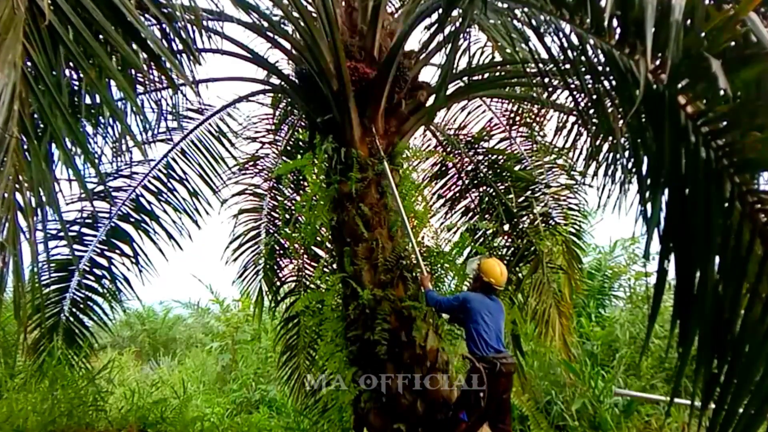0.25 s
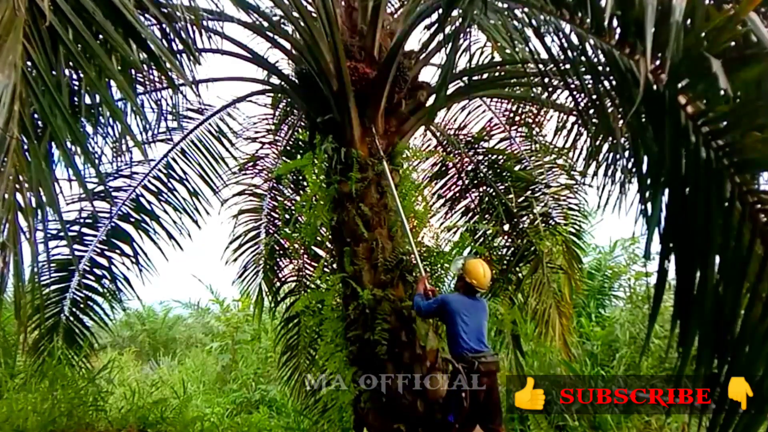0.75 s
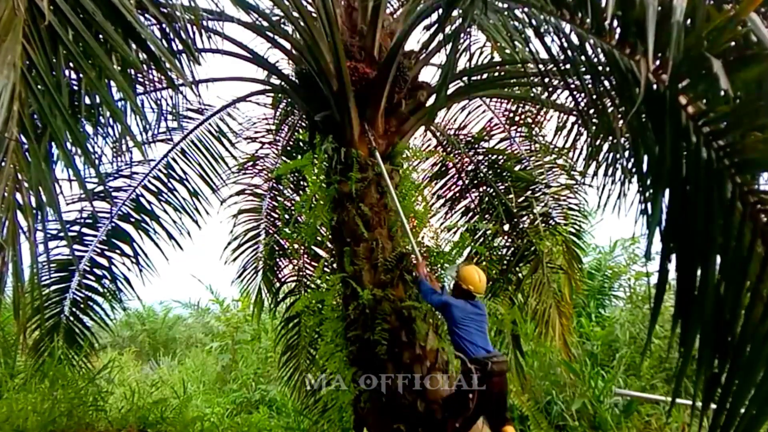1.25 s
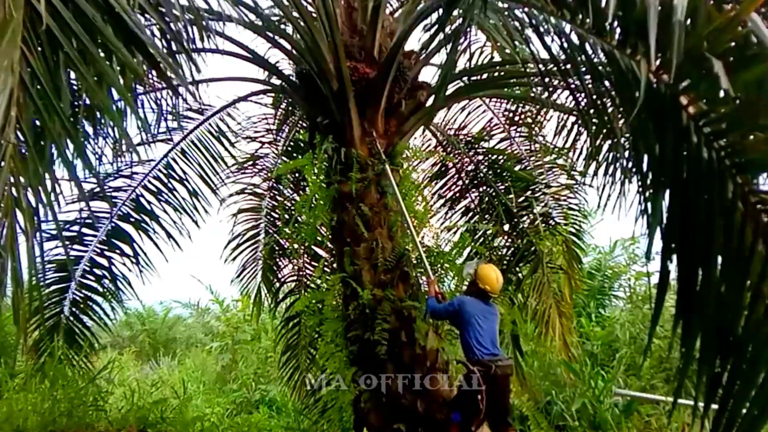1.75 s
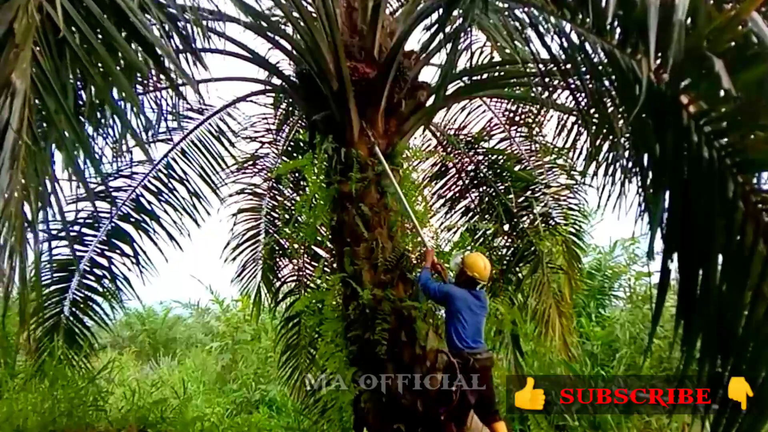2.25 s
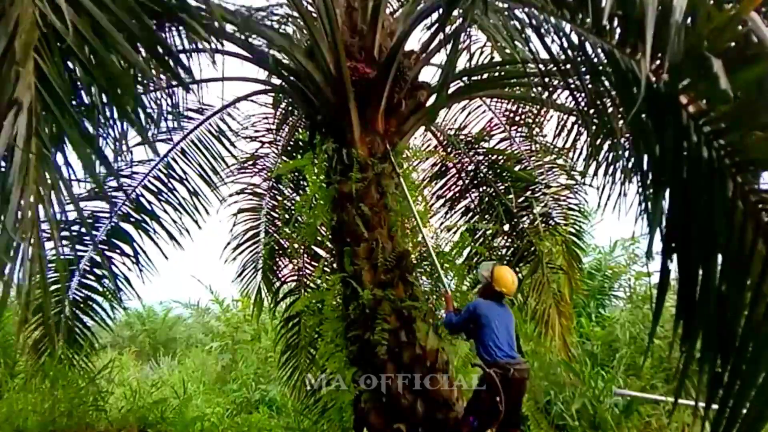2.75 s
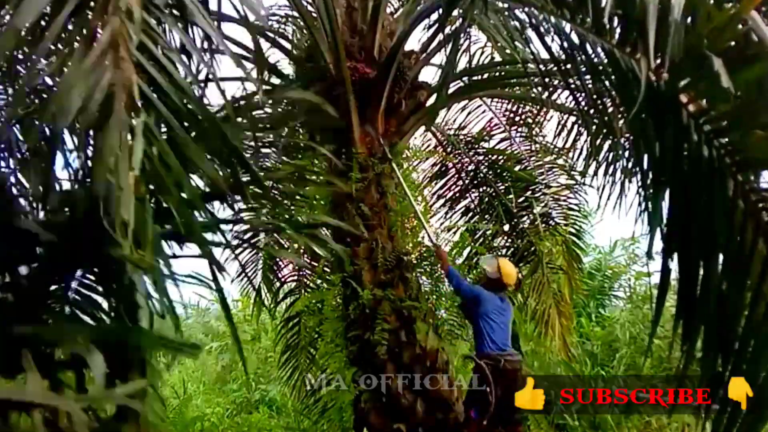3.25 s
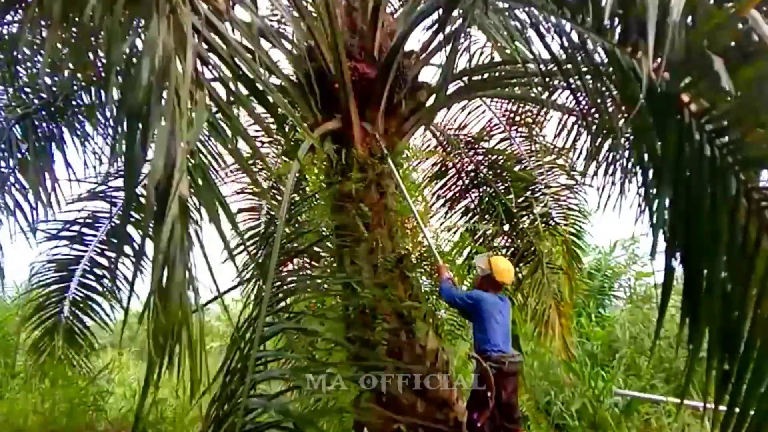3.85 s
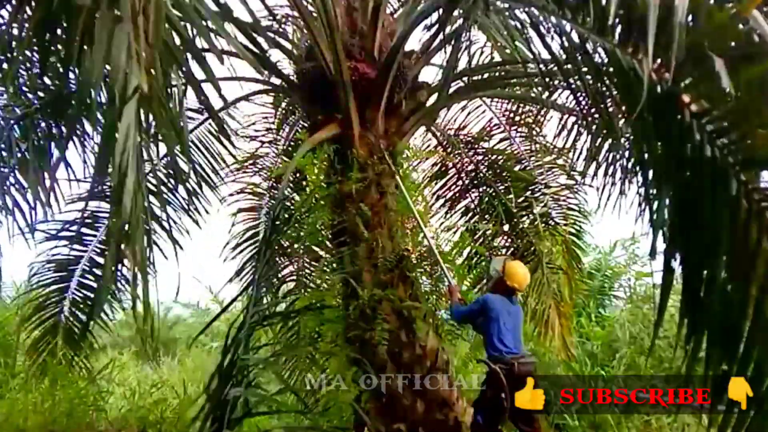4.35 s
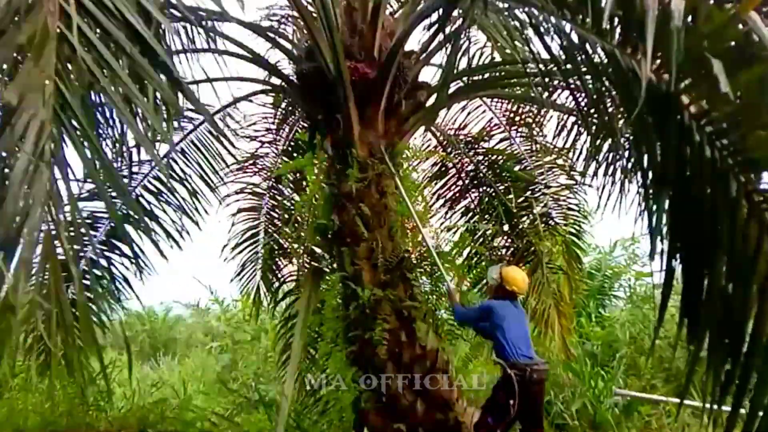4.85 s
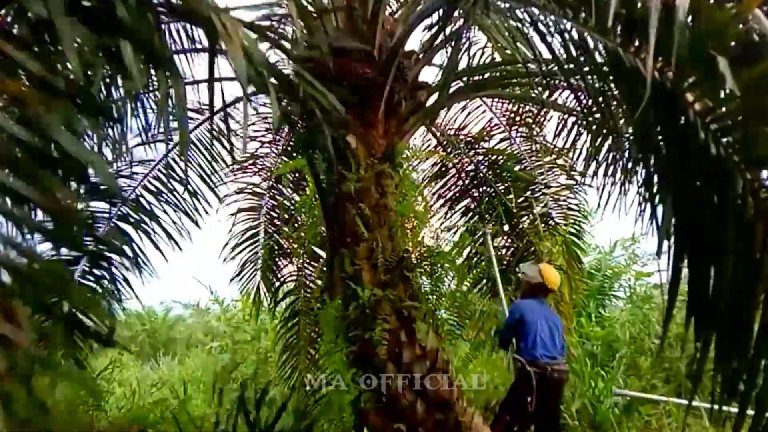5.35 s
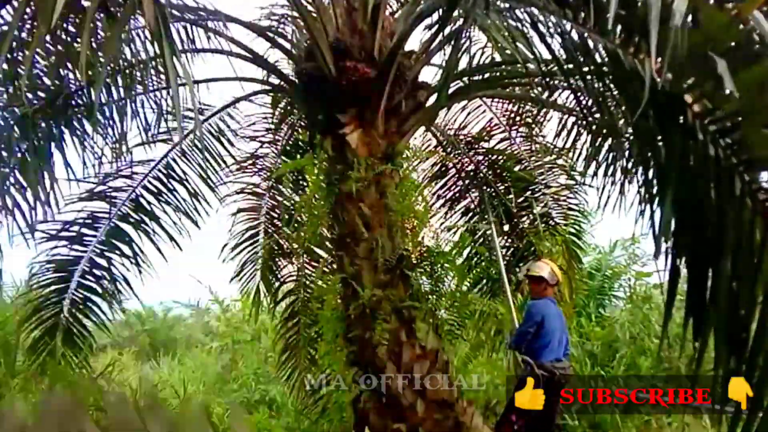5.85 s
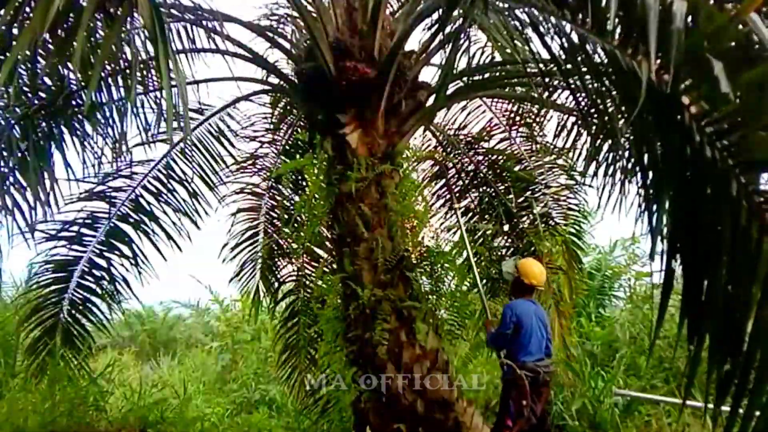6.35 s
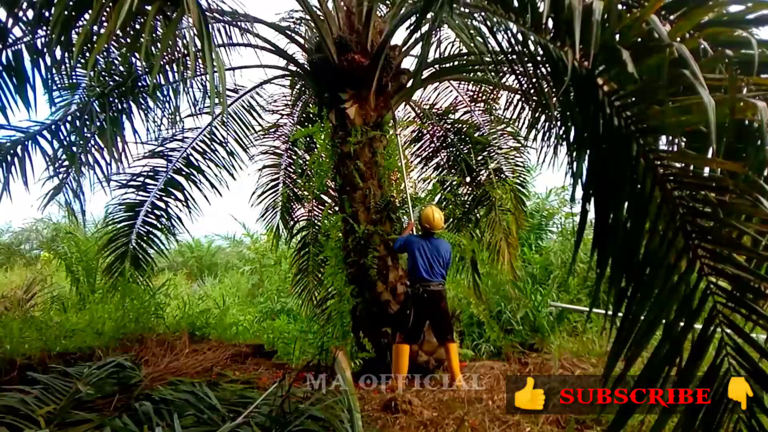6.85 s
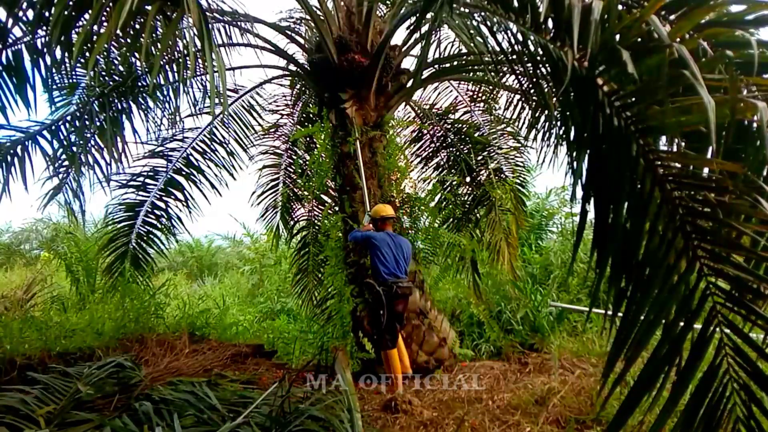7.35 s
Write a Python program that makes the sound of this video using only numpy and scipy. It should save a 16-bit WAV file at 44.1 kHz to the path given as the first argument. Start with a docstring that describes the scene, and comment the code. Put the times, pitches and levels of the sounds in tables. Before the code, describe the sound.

A pole sickle chops sharply into palm fronds with a metallic ring, stems cracking and leaves swishing down over droning insects.

```python
"""Cutting palm fronds

A sickle on a long metal pole hacks at palm fronds. Each blow tears fibres in a short burst
and sets the pole ringing; some leave the blade singing. Stems rip and snap, and cut fronds
swish down through the crown and thump on the ground. Cicadas drone over a quiet plantation."""
import sys
import numpy as np
from scipy import signal
from scipy.fft import rfft, irfft, next_fast_len
from scipy.io import wavfile
from scipy.ndimage import uniform_filter1d, minimum_filter1d

SR = 44100
rng = np.random.default_rng(int(sys.argv[2]) if len(sys.argv) > 2 else 0)


def pcm_store(signal):
    """Save signal as 16-bit PCM."""
    levels = np.round(np.clip(np.atleast_2d(signal), -1, 1) * 32767)
    wavfile.write(sys.argv[1], SR, levels.astype(np.int16).T)


N = 334719


def from_db(db):
    """Turn decibels into a volume factor."""
    return 10 ** (np.asarray(db) / 20)


def unit_power(x):
    """Scale a sound to an average power of 1."""
    return x / np.sqrt(np.mean(x ** 2) + 1e-20)


def cut(x, hz, kind):
    """Keep only the lows, the highs or a band."""
    return signal.sosfilt(signal.butter(4, hz, kind, fs=SR, output="sos"), x)


def colour(x, spectrum):
    """Shape a noise with a table of frequencies and levels."""
    hz, db = np.transpose(spectrum)
    size = next_fast_len(N)
    bins = np.maximum(np.arange(size // 2 + 1), 1) * SR / size
    gain = from_db(np.interp(np.log(bins), np.log(hz), db))
    return unit_power(irfft(rfft(x, size) * gain, size)[:N])


def drift(hz):
    """A smooth random wobble, about 1 in size."""
    r = np.exp(-2 * np.pi * hz / SR)
    return unit_power(signal.lfilter([1], [1, -2 * r, r * r], rng.standard_normal(N + SR))[SR:])


def ring(x, hz, fade_s):
    """Each click in x starts a tone. A fade time is how long it takes to drop 60 dB."""
    r, w = from_db(-60 / (fade_s * SR)), 2 * np.pi * hz / SR
    return signal.lfilter([0, np.sin(w)], [1, -2 * r * np.cos(w), r * r], x + 1e-18)


def resonate(x, hz, width_hz):
    """Bring out one pitch by ringing it twice."""
    fade_s = np.log(1000) / (np.pi * width_hz)
    return unit_power(ring(ring(x, hz, fade_s), hz, fade_s))


def grains(per_s, spread_db):
    """Random clicks, many small and a few large."""
    sizes = from_db(spread_db * np.minimum(rng.exponential(1, N), 5)) * rng.choice([-1, 1], N)
    return unit_power(sizes * (rng.random(N) < per_s / SR))


def swells(times, levels_db, rise_s, fade_s):
    """A volume curve of strokes that rise smoothly and die away."""
    out, t = 0, np.arange(N) / SR
    for start, db, rise, fade in np.broadcast(times, levels_db, rise_s, fade_s):
        age = np.maximum(t - start, 0)
        out = out + (1 - np.exp(-age / rise)) * from_db(db - 60 * age / fade)
    return out


# tone of the background: (frequency [Hz], level [dB])
HUSH_TONE = [(25, -23), (86, 2.5), (248, -10.5), (1260, -40.5), (1590, -44), (5110, -53.5), (7800, -58),
             (13200, -120)]

def hush():
    """A low, far-off hush that wavers."""
    return from_db(-66 + 3.8 * drift(6)) * colour(rng.standard_normal(N), HUSH_TONE)


# voices of the chorus: (pitch [Hz], width [Hz], level [dB])
CICADA_VOICES = [(7224, 390, -40.5), (6855, 680, -44), (8230, 200, -57), (14930, 690, -56.5)]

def cicadas():
    """Many cicadas click their tiny ringing drums out of step; the chorus throbs a little."""
    t, out = np.arange(N) / SR, 0
    throb_db = np.sin(2 * np.pi * 17 * t + 0.5 * drift(1.6))
    for hz, width_hz, db in CICADA_VOICES:
        voice = resonate(grains(2500, spread_db=1.5), hz, width_hz)
        out = out + voice * from_db(db + throb_db + drift(1))
    return cut(cut(out, 6020, "high"), 5700, "high")


# tone of leaves and fibres: (frequency [Hz], level [dB])
LEAF_TONE = [(60, -17), (107, -6), (187, -3.5), (910, -5), (1230, -3.5), (2980, -3), (5980, 1), (6560, -3),
             (7200, 1), (9400, -15), (12900, -23), (15500, -7.5)]
# leaflets brush as the crown shakes and fronds slide down: (time [s], level [dB])
SWISH = [(0.0, -55), (0.38, -77.5), (0.84, -74.5), (1.06, -58.5), (1.16, -73), (1.35, -34.5), (1.61, -54),
         (1.84, -62.5), (2.1, -49.5), (2.34, -66), (2.49, -37), (3.02, -39), (3.53, -33.5), (3.89, -37.5),
         (4.27, -36), (4.47, -42), (5.09, -30), (5.578, -37), (5.66, -29.5), (6.099, -31), (6.42, -49.5),
         (6.7, -62.5), (7.59, -74.5)]
# the pole slides over a stem and hums: (time [s], level [dB])
POLE_SLIDES = [(6.4, -42), (6.87, -49)]

def rustle():
    """Leaflets scrape in clumps, heavy stems drag and shudder at each thump, and the pole hums along."""
    swish_db = np.interp(np.arange(N) / SR, *np.transpose(SWISH))
    clumps = from_db(1.1 * drift(23) + 0.6 * drift(60))
    ticks = np.abs(grains(50, spread_db=1.5))
    crackle = 1 + 0.016 * signal.lfilter([1], [1, -np.exp(-300 / SR)], ticks)
    leaves = colour(grains(9000, spread_db=0.5) * clumps * crackle, LEAF_TONE)

    thump_s, thump_db, _ = np.transpose(STEM_THUMPS)
    shudder = swells(thump_s - 0.023, thump_db - 21, rise_s=0.0062, fade_s=0.32)
    drag = colour(rng.standard_normal(N) + 0.6 * grains(150, spread_db=1.5), LEAF_TONE)
    bumps = from_db(2.5 * drift(24))
    stems = unit_power(cut(drag, 735, "low")) * bumps * (from_db(swish_db - 6.5) + shudder)

    slides = swells(*np.transpose(POLE_SLIDES), rise_s=0.045, fade_s=0.48)
    hum = resonate(leaves, 1230, 90) * from_db(1.5 * drift(25))
    hum *= from_db(swish_db - 2.5) + slides

    mids = cut(leaves, [650, 4400], "band") * from_db(1.8 * drift(7))
    highs = cut(leaves, 5970, "high") * from_db(1.8 * drift(5))
    brighter = from_db(0.058 * (swish_db + 111.5))   # fast brushing is brighter
    return hum + stems + from_db(swish_db + 10) * (mids + brighter * highs)


# bands of the tearing noise, from dull to bright: (edge [Hz])
EDGES_HZ = np.array([200, 600, 1200, 2400, 4800, 9600, 16000])

def fibre_bands():
    """Tearing fibres and small splinters make a dense crackle, split here into bands."""
    fibres = grains(7000, spread_db=0.5)
    splinters = from_db(-6) * grains(200, spread_db=1)
    torn = colour(fibres + splinters, LEAF_TONE)
    return np.array([cut(torn, edges, "band") for edges in zip(EDGES_HZ, EDGES_HZ[1:])])


# stems splitting: (time [s], level [dB], rise time [s], fade time [s])
STEM_RIPS = [(-0.05, -26, 0.021, 0.23), (1.095, -20, 0.038, 0.66), (1.286, -23.5, .004, 0.14),
             (1.331, -12.5, 0.037, 0.26), (1.913, -20.5, 0.026, 0.28), (1.973, -18, 0.036, 0.52),
             (2.041, -11.5, 0.0064, 0.063), (2.079, -11.5, 0.0059, 0.067), (2.413, -8.5, 0.013, 0.094),
             (2.476, -5.5, 0.048, 0.27), (3.922, -12, 0.046, 0.4), (4.143, 1, .03, 0.086),
             (4.889, -8.5, 0.034, 0.24), (5.01, -6, .008, 0.036), (7.229, -42, 0.0035, 0.12),
             (7.271, -28.5, 0.0059, 0.27)]

def rips(bands):
    """The crackle of fibres swells and fades as a stem slowly splits."""
    return cut(swells(*np.transpose(STEM_RIPS)) * bands.sum(0), 220, "high")


# tones of the free blade and pole: (pitch [Hz], level [dB], fade time [s])
BLADE_TONES = [(3745, -6, 0.4), (3720, -4, 0.6), (1250, -2, .35), (2105, -2, .25), (2608, -1, .28),
               (4810, -7, .2)]
# blows that leave the blade free to sing: (time [s], level [dB])
BLADE_STRIKES = [(0.001, -43), (1.136, -27.5), (1.321, -28), (1.95, -26), (2.455, -26), (3.102, -31),
                 (4.652, -29), (5.045, -25), (6.984, -49.5)]

def blade():
    """The blade rings on, struck unevenly each time; two close tones pulse against each other."""
    times, db = np.transpose(BLADE_STRIKES)
    out, uneven_db = 0, 2 * rng.standard_normal((len(times), len(BLADE_TONES)))
    for (hz, tone_db, fade_s), extra_db in zip(BLADE_TONES, uneven_db.T):
        clicks = np.zeros(N)
        clicks[(times * SR).astype(int)] = from_db(db + tone_db + extra_db)
        out = out + from_db(3.5 * drift(35)) * ring(clicks, hz, fade_s)
    return cut(out, 990, "high")


# faint calls: (time [s], level [dB], pitch [Hz])
FAR_CHIRPS = [(0.163, -57, 1980), (0.665, -66, 3350), (7.426, -55.5, 2420)]

def chirps(length_s=0.075):
    """Short, rough whistles far away."""
    out, size = np.zeros(N), round(length_s * SR)
    for start, db, hz in FAR_CHIRPS:
        whistle = resonate(rng.standard_normal(SR // 5), hz, width_hz=210)[-size:]
        out[round(start * SR):][:size] += from_db(db) * whistle * np.hanning(size)
    return out


def woodiness(hz, centre_hz=1580, width_octaves=0.96):
    """How near a pitch is to the woody tone of a stem, from 0 to 1."""
    return np.exp(-(np.log2(hz / centre_hz) / width_octaves) ** 2 / 2)


# the sickle hits: (time [s], level [dB], fade time [s], brightness [dB/octave], woody boost [dB])
SICKLE_BLOWS = [(0.221, -49, 0.074, -10.5, 2), (0.854, -49.5, 0.2, -7.5, -1), (1.136, -1, 0.17, 1, 1),
                (1.309, -11.5, 0.062, -1, 12), (1.321, 3.5, 0.042, 1.5, -2.5),
                (1.891, -44, 0.16, -9.5, -0.5), (1.95, 1.5, 0.052, 3.5, 8.5), (2.452, 2, 0.057, 2, 0),
                (3.1, -5, 0.21, 2.5, -1), (3.925, -14.5, 0.24, 3, 5), (4.104, 1.5, 0.12, 1.5, -5.5),
                (4.622, -2.5, 0.18, 1.5, 9.5), (4.856, 5.5, 0.049, 2, -6.5), (4.966, -5, 0.14, 5, -5),
                (5.043, 8.5, 0.028, 6, 0), (5.61, -10, 0.23, -0.5, -5), (5.721, -16, 0.18, 12, 1.5),
                (6.981, -32, 0.15, 2, -7), (7.242, -12.5, 0.15, 1.5, 5), (7.305, -26, 0.28, 0.5, 4)]

def blows(bands, bite_s=0.0078):
    """Fibres crack, tear at full force while the blade bites, then die away."""
    out = np.zeros(N)
    wood = woodiness(np.sqrt(EDGES_HZ[1:] * EDGES_HZ[:-1]))
    for start, db, fade_s, bright_db, wood_db in SICKLE_BLOWS:
        at = round(start * SR)
        t = np.arange(min(SR // 2, N - at)) / SR
        tear = from_db(-60 * np.maximum(t - bite_s, 0) / fade_s)
        crack = from_db(5 - 60 * t / 0.03)
        band_gains = from_db(bright_db * (np.arange(len(bands)) - 3.5) + wood_db * wood)
        fibres = band_gains @ bands[:, at:at + len(t)]
        out[at:at + len(t)] += from_db(db - 17.5) * (tear + crack) * fibres
    return cut(out, 220, "high")


# tones of the metal pole: (pitch [Hz], level [dB], fade time [s])
POLE_TONES = [(1213, 1.5, 0.05), (1257, -7, 0.13), (1628, 1, 0.055), (2072, -1.5, 0.044),
              (2612, 2.5, 0.039), (3300, -6.5, 0.048), (6070, -1, 0.025), (6310, -9, 0.12), (7140, 2, 0.02)]

def pole():
    """Each blow jolts the pole, striking every tone with a strength of its own."""
    pitches = np.array(POLE_TONES)[:, 0]
    uneven_db = 3 * rng.standard_normal((len(SICKLE_BLOWS), len(pitches)))
    jolt_shape = from_db(-4.5 - 9000 * np.arange(SR // 100) / SR)
    strikes = np.zeros((len(pitches), N))
    for (start, db, fade_s, bright_db, wood_db), extra_db in zip(SICKLE_BLOWS, uneven_db):
        jolt = rng.standard_normal(len(jolt_shape)) * jolt_shape   # the blade judders in
        ring_db = db - 23 + 4 * np.log2(10 * fade_s)   # a longer tear shakes the pole more
        tone_db = bright_db * np.log2(pitches / 3400) + wood_db * woodiness(pitches)
        at = round(start * SR)
        strikes[:, at:at + len(jolt)] += np.outer(from_db(ring_db + tone_db + extra_db), jolt)
    flutter = from_db(2.5 * drift(45))   # hands and stems muffle the swaying pole unevenly
    ringing = sum(from_db(db) * ring(x, hz, fade_s) for x, (hz, db, fade_s) in zip(strikes, POLE_TONES))
    return cut(flutter * ringing, 820, "high")


# stems hit trunk and ground: (time [s], level [dB], pitch [Hz])
STEM_THUMPS = [(0.225, -35.5, 201), (0.87, -36, 313), (1.149, -22, 365), (1.205, -20.5, 292),
               (1.29, -21.5, 304), (1.34, -19.5, 310), (1.47, -30, 560), (1.626, -38.5, 212),
               (2.006, -10, 325), (2.522, -15, 310), (3.098, -19, 305), (3.944, -2.5, 169.5),
               (3.989, -18, 90.5), (4.177, -15, 311), (4.916, -19.5, 310), (5.107, -23.5, 66.4),
               (5.613, -10.5, 109), (6.79, -45, 264), (6.89, -45, 243), (7.544, -38, 109.6)]

def thumps():
    """A soft push starts one low tone, which dies faster the higher it is."""
    out = np.zeros(N)
    for start, db, hz in STEM_THUMPS:
        at, push = round(start * SR), np.hanning(round(SR / hz / 2))
        force = np.zeros(min(SR // 2, N - at))
        force[:len(push)] = push / push.sum()
        thud = ring(force, hz, fade_s=0.052 + 0.5 / hz)
        out[at:at + len(thud)] += from_db(db) * cut(thud, 0.74 * hz, "high")
    return out


# dry fibres break: (time [s], level [dB], pitch [Hz])
FIBRE_SNAPS = [(0.331, -49, 1290), (0.962, -33, 1880), (1.112, -21, 1700), (1.511, -24.5, 695),
               (2.066, -7, 1500), (2.419, -8, 1480), (2.716, -5.5, 6400), (2.738, -15, 3900),
               (2.785, -9, 2520), (2.842, -11, 3620), (2.858, -10.5, 2400), (3.068, -8, 925),
               (3.295, -7.5, 6300), (3.39, -8.5, 1750), (3.503, -19, 2400), (4.172, -8.5, 1010),
               (4.328, -11, 3200), (4.655, -14, 2270), (4.935, -6, 1510), (4.949, 0, 6600),
               (5.821, 0, 2600), (7.328, -31, 2500)]

def snaps(fade_s=0.032, click_s=0.004):
    """A dry fibre gives way with a click and a short crack at a woody pitch of its own."""
    out, age = np.zeros(N), np.arange(SR // 10) / SR
    dying = from_db(-60 * age / fade_s) + from_db(-60 * age / click_s)
    for start, db, hz in FIBRE_SNAPS:
        crack = rng.standard_normal(len(age)) * dying
        burst = resonate(crack, hz, width_hz=0.65 * hz)
        burst += from_db(-2) * unit_power(cut(crack, [900, 8000], "band"))
        out[round(start * SR):][:len(burst)] += from_db(db) * burst / np.abs(burst).max()
    return cut(out, 450, "high")


# the blade scrapes along a stem: (time [s], level [dB], rise time [s])
RASP_STROKES = [(0.851, -29.5, 0.016), (1.023, -32, 0.01), (6.65, -42.5, 0.015), (6.79, -20.5, 0.42),
                (6.985, -37.5, 0.0044), (7.139, -41, 0.011)]
# tones of the scraping blade: (pitch [Hz], width [Hz], level [dB])
RASP_TONES = [(3700, 70, -4), (3840, 380, -1), (4100, 1260, -2)]

def rasp():
    """The blade sticks and slips in quick clicks that make it ring roughly."""
    slips = grains(1700, spread_db=1) * from_db(2.5 * drift(28))
    scrape = sum(from_db(db) * resonate(slips, hz, width_hz) for hz, width_hz, db in RASP_TONES)
    return swells(*np.transpose(RASP_STROKES), fade_s=0.34) * unit_power(scrape)


def limit(x, above_db=-6, share=0.5, ahead_s=0.012, recover_db_per_s=400):
    """Turn the volume down just before a loud peak, then quickly back up."""
    ahead, ramp = round(ahead_s * SR), recover_db_per_s * np.arange(N) / SR
    level_db = 20 * np.log10(np.abs(x).max(0) + 1e-9)
    dip_db = share * np.maximum(level_db - above_db, 0)
    held_db = np.maximum.accumulate(dip_db + ramp) - ramp
    early_db = -minimum_filter1d(-held_db, size=ahead, origin=-(ahead // 2))
    return x * from_db(-uniform_filter1d(early_db, size=ahead // 2))


def scene():
    """Add up all the sounds, the same in both ears."""
    scraping = rustle() + rasp()
    bands = fibre_bands()
    cutting = rips(bands) + blows(bands) + pole() + snaps() + blade()
    return np.tile(scraping + cutting + thumps() + cicadas() + chirps() + hush(), (2, 1))


def record(dry):
    """Tame and clip the loudest peaks, then remove the deep bass and the highest treble."""
    held = cut(np.clip(limit(dry), -1, 1), 43, "high")
    treble_cut = signal.ellip(16, 0.5, 60, 15540, fs=SR, output="sos")
    return np.clip(signal.sosfilt(treble_cut, held), -1, 1)


dry = scene()
out = record(dry)
pcm_store(out)
```